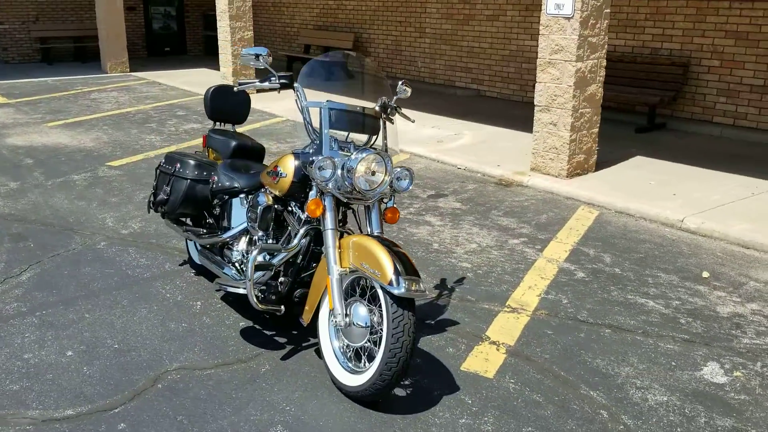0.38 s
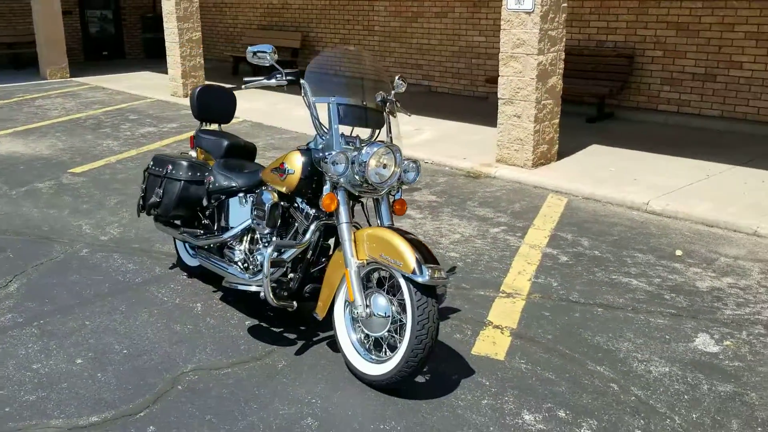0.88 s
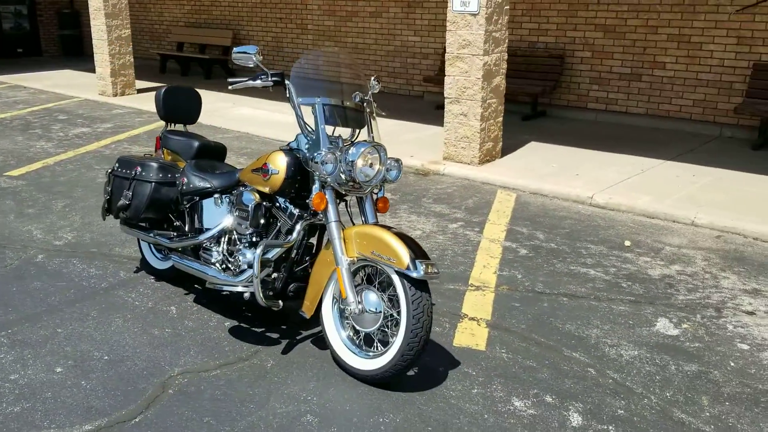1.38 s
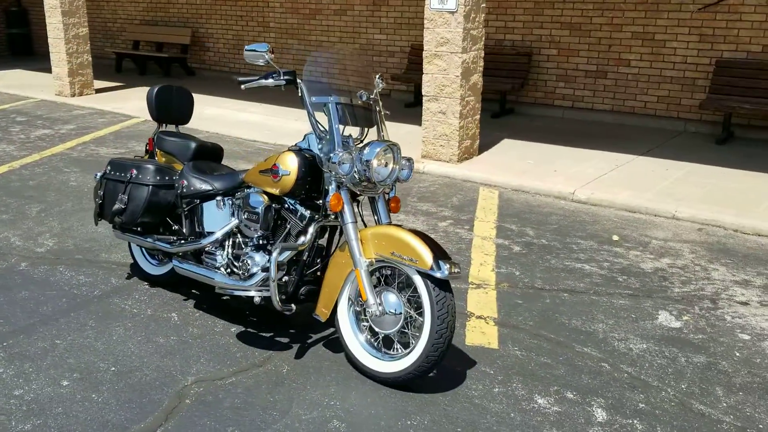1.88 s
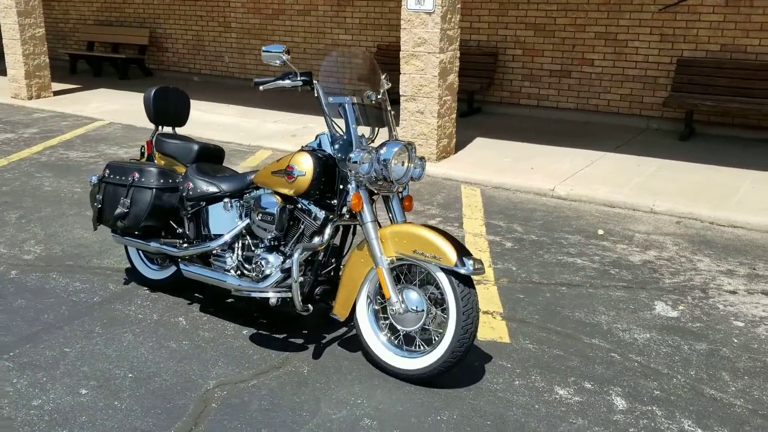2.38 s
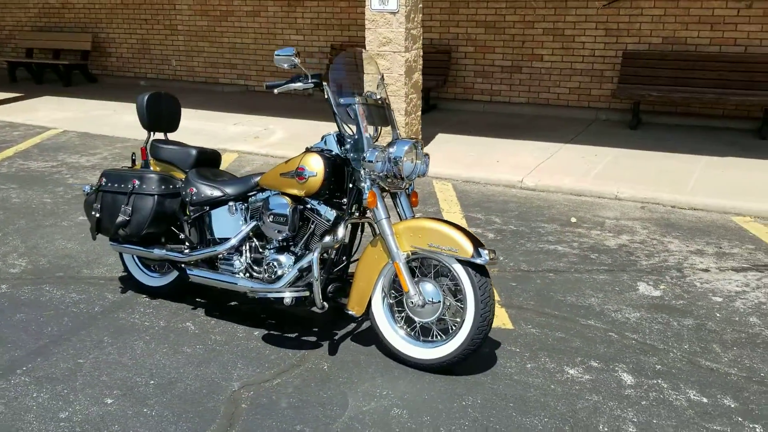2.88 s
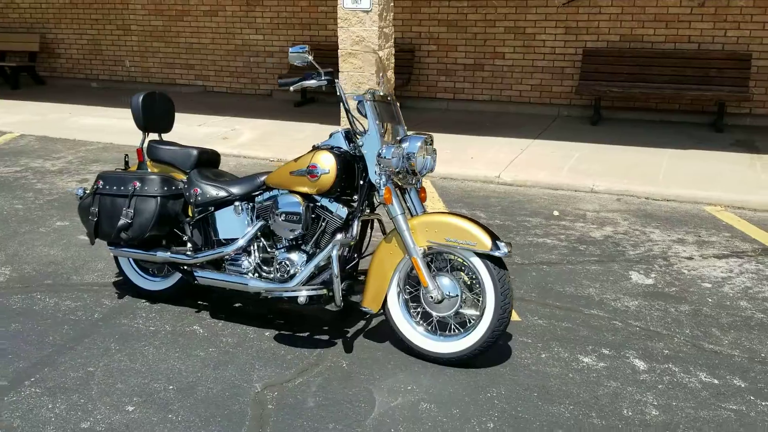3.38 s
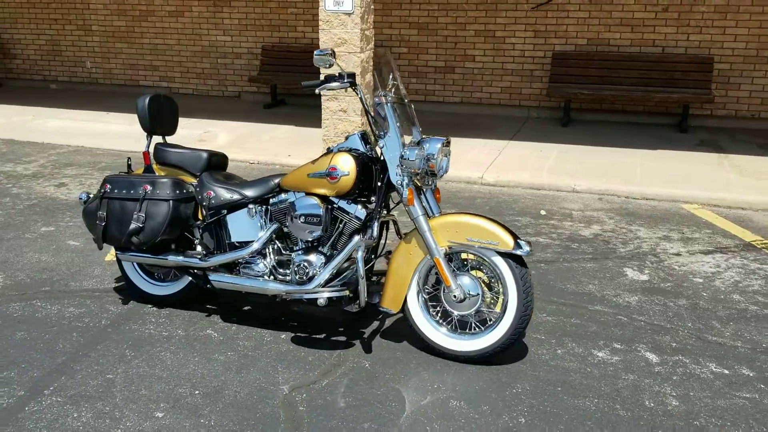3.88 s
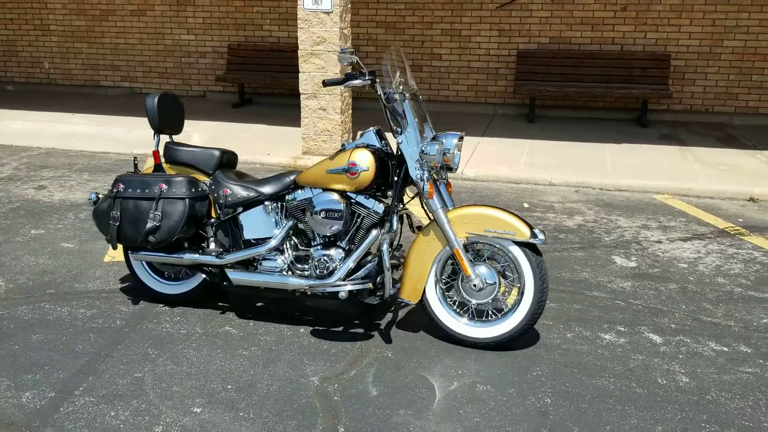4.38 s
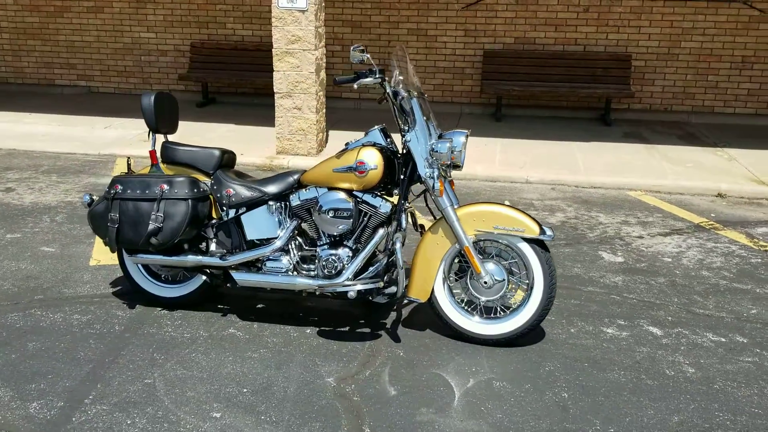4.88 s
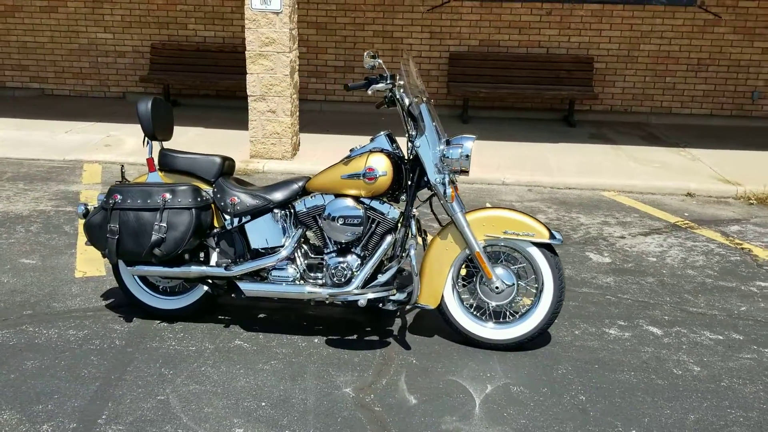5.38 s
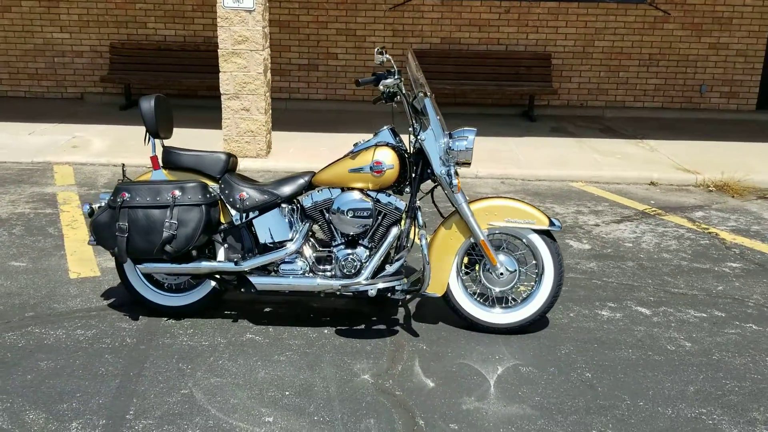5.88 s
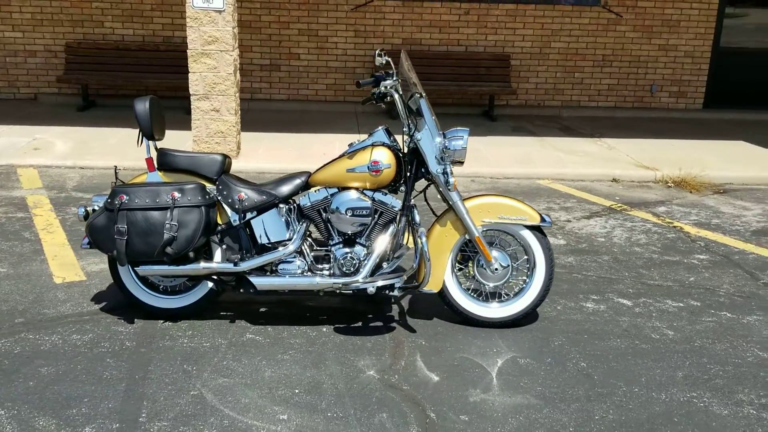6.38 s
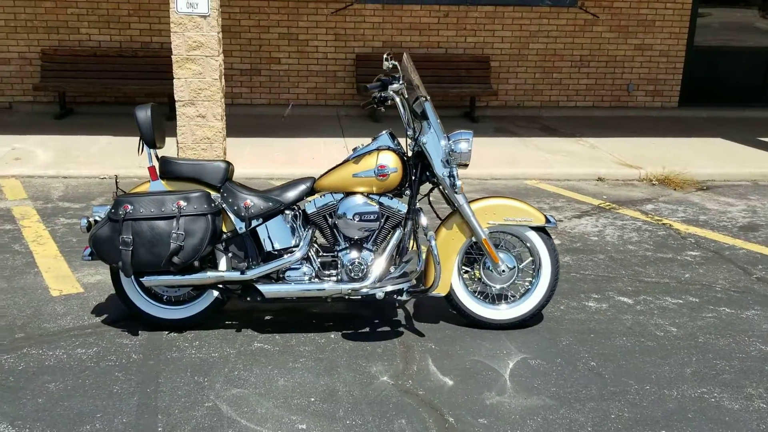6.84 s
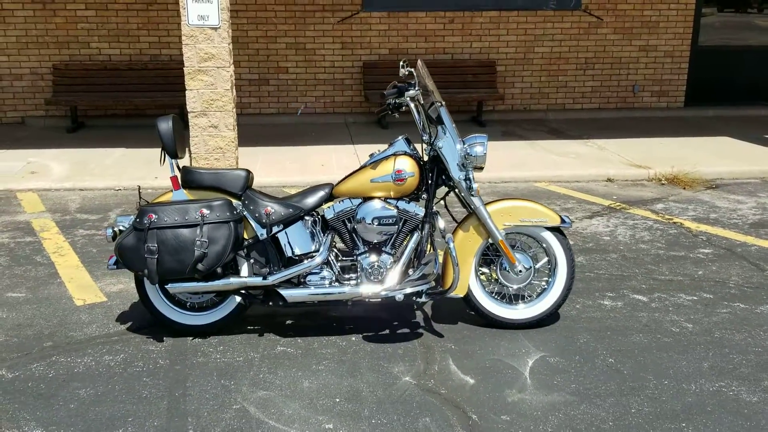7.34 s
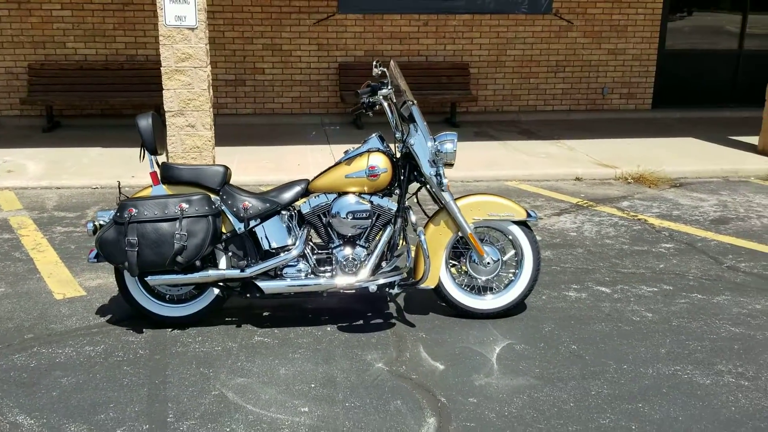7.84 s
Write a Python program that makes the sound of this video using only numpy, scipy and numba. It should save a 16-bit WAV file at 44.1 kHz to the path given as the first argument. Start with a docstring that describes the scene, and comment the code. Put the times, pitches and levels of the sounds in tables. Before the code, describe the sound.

A large V-twin motorcycle idles throughout in an open lot beside a brick wall. Deep thumps come about nine or ten a second in uneven pairs, strong then often weak, each strong one tipped with a short hissy crack. Fine metallic valve clatter and low rumble run underneath. A handheld phone moves slowly round it, catching brief echo off wall and asphalt, so the tone shifts gently.

```python
"""A big V-twin motorcycle idles on an asphalt lot, heard by a phone walking slowly round it.
The front cylinder fires every cycle, twice stumbling; the rear one often misses and burns weakly.
Each stroke rings the pipes as a thump, spits a crack of filtered hiss and knocks the muffler.
A brick wall sends these back as an echo, the asphalt and the lot return the cracks, and
valve-train clatter (hiss with small ticks) and a low rumble of noise run all through."""
import sys
import numpy as np
from scipy import signal
from scipy.fft import rfft, irfft, next_fast_len
from scipy.io import wavfile
from scipy.ndimage import uniform_filter1d, map_coordinates
from numba import njit

SR = 44100
rng = np.random.default_rng(int(sys.argv[2]) if len(sys.argv) > 2 else 0)


def transcribe(signal):
    """Save signal, clipped to [-1, 1], as a 16-bit WAV file at the path in sys.argv[1]."""
    frames = np.atleast_2d(signal).T
    limited = np.clip(frames, -1, 1)
    pcm = np.round(limited * 32767).astype(np.int16)
    wavfile.write(sys.argv[1], SR, pcm)


def ratio_of_db(decibels):
    """Turn decibels (scalar or array-like) into linear amplitude factors; 0 dB maps to 1."""
    return 10 ** (np.asarray(decibels, float) / 20)


N = 351918  # samples, about 8 s


def colour(x, points, lag=((1, 0), (2, 0))):
    """Shape a sound by (Hz, dB) points, with an optional phase lag (Hz, radians)."""
    size = next_fast_len(N + 4096)
    hz = np.arange(size // 2 + 1) * SR / size
    point_hz, point_db = np.transpose(points)
    lag_hz, lag_rad = np.transpose(lag)
    gain = ratio_of_db(np.interp(np.log(hz + 1), np.log(point_hz), point_db))
    turn = np.exp(-1j * np.interp(hz, lag_hz, lag_rad))
    return irfft(rfft(x, size) * gain * turn, size)[..., :N]


def level(x, db):
    """Scale to an rms level."""
    return x * ratio_of_db(db) / np.sqrt(np.mean(x ** 2))


@njit
def moving_bandpass(x, hz, width):
    """State-variable band-pass with a moving centre, where its gain is 1."""
    y, band, low = np.empty(len(x)), 0., 0.
    for i in range(len(x)):
        g, damping = np.tan(np.pi * hz[i] / SR), width / hz[i]
        v = (band + g * (x[i] - low)) / (1 + g * (g + damping))
        band, low = 2 * v - band, low + 2 * g * v
        y[i] = damping * v
    return y


def ringing(x, hz, width_hz, db):
    """One resonance, fixed or moving, on both microphone ports."""
    return ratio_of_db(db) * np.array([moving_bandpass(v, hz + np.zeros(N), width_hz) for v in x])


def wander(rate):
    """Random levels held 1 / rate s and smoothed twice by a moving average that long."""
    hold = int(SR / rate)
    steps = np.repeat(rng.standard_normal(N // hold + 1), hold)
    return 1.03 * uniform_filter1d(uniform_filter1d(steps, hold), hold)[:N]


def hiss(wide, apart_hz):
    """Noise shared by both ports in the bass, partly unrelated higher up."""
    near, *apart = rng.standard_normal((3, N))
    highpass = signal.butter(2, apart_hz, "high", fs=SR, output="sos")
    return near + wide * signal.sosfilt(highpass, apart)


def add(out, piece, s):
    """Mix a short sound in at time s."""
    i = int(s * SR)
    a, b = max(i, 0), min(i + len(piece), N)
    out[a:max(a, b)] += piece[a - i:max(b - i, a - i)]


# Tone of the clatter. Each row: frequency in Hz, gain in dB.
CLATTER_TONE = [(100, -34), (200, 6.5), (400, 5), (700, -0.5), (1000, 4), (1400, -0.5), (2500, -4),
                (3600, -0.5), (4300, -2.5), (5200, -8.5), (7200, -5.5), (9000, -25.5), (11800, -29),
                (16000, -40)]


def clatter(db, ticks_per_s=190.0, spread_db=3.5, tick_s=0.0028, tick_db=-8, flicker_db=2.17):
    """Valve gear, chain and intake: flickering hiss with small ticks and a faint casing ring."""
    size = ratio_of_db(spread_db * rng.exponential(size=N)) * (rng.random(N) < ticks_per_s / SR)
    ticks = signal.lfilter([1], [1, -np.exp(-1 / (tick_s * SR))], size)
    strength = ratio_of_db(flicker_db * wander(18)) + level(ticks, tick_db)
    gear = strength * hiss(wide=0.9, apart_hz=360.0)
    casing = ringing(gear, hz=916.0, width_hz=55.0, db=-4.0)
    return ratio_of_db(db) * level(colour(gear, CLATTER_TONE) + casing, 0)


# Tone of the rumble. Each row: frequency in Hz, gain in dB.
RUMBLE_TONE = [(25, -38), (40, -0.5), (60, -0.5), (85, -15), (150, -2), (200, -9), (300, -10.5),
               (500, -47.5)]


def rumble(db=-28, flicker_db=1.0):
    """Turbulent low pipe noise whose level flickers gently under the thumps."""
    return level(colour(rng.standard_normal(N), RUMBLE_TONE) * ratio_of_db(flicker_db * wander(17)), db)


# How far the crank has turned, read at the front cylinder's exhaust stroke; the idle hunts up and down.
# Each row: time in seconds, engine cycles so far.
CRANK_TURNS = [(.0122, 0), (.1218, 1), (.548, 5), (.86, 8), (.9686, 9), (1.0718, 10), (1.17, 11),
               (1.2834, 12), (1.4942, 14), (2.0302, 19), (2.7664, 26), (2.9824, 28), (3.5124, 33),
               (3.7179, 35), (3.9387, 37), (4.1526, 39), (4.3704, 41), (4.475, 42), (4.6899, 44),
               (4.9073, 46), (5.01, 47), (5.5516, 52), (5.6623, 53), (5.9884, 56), (6.1985, 58),
               (6.419, 60), (6.6275, 62), (7.7221, 72), (7.8306, 73), (7.9352, 74)]
# Full strokes as heard on the way round, before scatter and overall gains. Each row: time in seconds,
# front thump in dB, front crack in dB, rear thump in dB, rear crack in dB.
FULL_STROKES = [(0, -0.7, -19, 0, -29), (.7, -0.4, -17.5, -0.5, -27), (1.4, -0.8, -17.5, 0.7, -28),
                (2.6, -.5, -17, 1.5, -26), (3.6, -.5, -18.5, 2, -25), (4.6, -1.1, -18, 0.5, -24),
                (5.4, -0.7, -16, 0.5, -25.5), (6.3, -1.5, -17, -1.5, -25), (6.9, 0, -15.5, 2, -27),
                (8, 1.4, -15, -3.3, -23.5)]
# Rear misfires, whose charge burns late and weakly. Each row: rough time in seconds, thump in dB.
WEAK_REAR_STROKES = [(.06, -7), (.277, -7.5), (.491, -7.5), (.7, -9.5), (.907, -6), (1.117, -9),
                     (1.542, -7.5), (1.755, -16), (1.97, -5), (2.183, -7.5), (2.395, -9), (2.605, -7.5),
                     (2.816, -6.5), (3.031, -9.5), (3.243, -17.5), (3.454, -6.5), (3.665, -5.5),
                     (3.875, -11), (4.094, -18), (4.526, -6.5), (4.74, -15), (5.059, -5), (5.275, -14),
                     (5.492, -6), (5.709, -6.5), (5.927, -7), (6.144, -7.5), (6.357, -8.5), (6.573, -8),
                     (6.785, -7)]
# Front strokes that stumble. Each row: rough time in seconds, thump in dB, crack in dB.
WEAK_FRONT_STROKES = [(1.17, -4, -36), (6.627, -2.5, -26)]
# Random spread from stroke to stroke. One row: time in seconds, thump in dB, crack in dB.
STROKE_SCATTER = (0.00056, 0.85, 1.75)


def strokes(rear_follows=.451, weak_crack_db=-37.5):
    """Exhaust strokes (s, thump dB, crack dB), front and rear in turn, timed by the crank."""
    s, cycle = np.transpose(CRANK_TURNS)
    front = np.interp(np.arange(cycle[-1] + 1), cycle, s)
    rear = front[:-1] + rear_follows * np.diff(front)  # rear_follows is a share of a cycle
    when, *columns = np.transpose(FULL_STROKES)
    rows = np.zeros((len(front) + len(rear), 3))
    rows[::2] = np.transpose([front] + [np.interp(front, when, c) for c in columns[:2]])
    rows[1::2] = np.transpose([rear] + [np.interp(rear, when, c) for c in columns[2:]])
    weak = [(np.argmin(abs(rows[:, 0] - t)), db) for t, db in WEAK_REAR_STROKES]
    # unburnt charge from a weak rear stroke strengthens the thump and crack of the next ones
    for k, db in weak:
        rows[k + 1, 1:] += 1.16, 0.55  # front, dB
        rows[k + 2, 1:] -= db * np.array((0.082, 0.32))  # rear, dB per dB missed
    rows += rng.standard_normal(rows.shape) * STROKE_SCATTER
    for k, db in weak:
        rows[k, 1:] = db, weak_crack_db
    for t, *dbs in WEAK_FRONT_STROKES:
        rows[np.argmin(abs(rows[:, 0] - t)), 1:] = dbs
    return rows


# Tone of the gas jet. Each row: frequency in Hz, gain in dB.
CRACK_TONE = [(200, -32), (480, 6.5), (750, -6.5), (1100, 4), (1400, 6.5), (1700, -0.5), (2000, 11),
              (2500, 0), (4200, -0.5), (5000, -9), (7000, -5), (9300, -26), (11500, -3.5), (15500, -24)]


def cracks(fired, bright_hz, peak_s=-0.00093, rise_s=0.0018, fall_s=0.0046, tail_db=-13, tail_s=0.0073,
           crack_db=-2.5, rear_ring_db=-7):
    """A short jet of gas at each stroke, coloured by muffler and shell; a bright resonance rings most on front
    strokes."""
    gates, t = np.zeros((2, N)), np.arange(SR // 14) / SR - 6 * rise_s
    fall = (np.exp(-t / fall_s) + ratio_of_db(tail_db) * np.exp(-t / tail_s)) / (1 + ratio_of_db(tail_db))
    for k, (s, _, db) in enumerate(fired):
        puff = np.where(t < 0, np.exp(t / rise_s), fall)
        add(gates[k % 2], ratio_of_db(db) * puff, s + peak_s + t[0])
    gas = hiss(wide=0.73, apart_hz=3870.0)
    jet = gates.sum(axis=0) * gas
    bright_gas = (gates[0] + ratio_of_db(rear_ring_db) * gates[1]) * gas
    bright_ring = ringing(bright_gas, bright_hz, width_hz=465.0, db=12)
    shell = ringing(jet, hz=934.0, width_hz=55.0, db=8.0)
    shell += ringing(jet, hz=1360.0, width_hz=75.0, db=-0.5)
    shell += ringing(jet, hz=2010.0, width_hz=37.0, db=-3.0)
    return ratio_of_db(crack_db) * (colour(jet, CRACK_TONE) + bright_ring + shell)


def delayed(x, lag_ms):
    """Read a sound at a moving lag, as along a path that changes length."""
    place = np.arange(N) - lag_ms / 1000 * SR
    return np.array([map_coordinates(v, [place], order=3) for v in x])


def lot(x, t60_s=0.72, db=-17):
    """Diffuse return from the buildings round the lot: a fading noise tail, different at each port."""
    t = np.arange(int(.6 * SR)) / SR
    tail = rng.standard_normal((2, len(t))) * 1000. ** (-t / t60_s) * (1 - np.exp(-t / 0.004))
    return ratio_of_db(db) * signal.fftconvolve(x, tail / np.sqrt(np.sum(tail[0] ** 2)), axes=1)[:, :N]


def stroke_kind(k, thump_db, misfire_below_db=-4):
    """0 for a front stroke, 1 for a rear one, 2 for a misfire."""
    return 2 if thump_db < misfire_below_db else k % 2


def ring(t, modes, kind, detune, scatter_db, rise_s=.01):
    """Damped pipe modes that swell in as the valve moves."""
    t = np.maximum(t, 0)
    tones = 0
    for (hz, t60, *sizes), db in zip(modes, scatter_db):
        fade = 1000. ** (-t / t60)
        tones = tones + sizes[kind] * ratio_of_db(db) * np.sin(2 * np.pi * hz * detune * t) * fade
    return (1 - np.exp(-t / rise_s)) * tones


# Pipe modes rung as the exhaust valve opens. Each row: frequency in Hz before detuning, time to fade
# 60 dB in seconds, then signed size for a front stroke, a rear stroke and a misfire.
BLOWDOWN_MODES = [(73.8, .4, -.25, -.214, .51), (103.7, .324, .331, .403, .59),
                  (131.4, .4, .112, .207, .21), (233.7, .057, -.233, .057, .045),
                  (316.6, .033, -.243, .005, -.04)]
# Pipe modes rung as the flow chokes and washes back. Each row: frequency in Hz before detuning, time to
# fade 60 dB in seconds, then signed size for a front stroke, a rear stroke and a misfire.
BACKWASH_MODES = [(85.1, .148, .073, .341, -.47), (102.3, .084, .183, .409, 1.47),
                  (137.6, .08, -.281, -.353, -.6), (146.9, .025, -.394, .205, -1.45)]
# Valve timing, with a row each for front, rear and misfire (bark() uses it too).
# Each row: seconds the valve opens before the stroke time, seconds the flow chokes after it.
VALVE_TIMES = [(.0075, .0243), (.0076, .0134), (.0091, .018)]


def thumps(fired, detune=.014, choke_s=.0045, choke_jitter_s=0.00032, scatter_db=.9):
    """Blowdown as the valve opens, choked and followed by a backwash; no two strokes ring quite alike."""
    out, t = np.zeros(N), np.arange(SR // 6) / SR
    chance = rng.standard_normal((len(fired), 11))
    for k, ((s, db, _), c) in enumerate(zip(fired, chance)):
        kind = stroke_kind(k, db)
        opens, chokes = VALVE_TIMES[kind]
        after = t - opens - chokes - choke_jitter_s * c[0]
        pitch = 1 + detune * c[1]
        blow = ring(t, BLOWDOWN_MODES, kind, pitch, scatter_db * c[2:7])
        blow = blow * np.exp(-np.maximum(after, 0) / choke_s)
        wash = ring(after, BACKWASH_MODES, kind, pitch, scatter_db * c[7:])
        add(out, ratio_of_db(db) * (blow + wash), s - opens)
    return out


# Muffler shell modes knocked by every pressure front. Each row: frequency in Hz, width in Hz, gain in dB.
MUFFLER_MODES = [(249, 42, -17), (271, 25, -5.5), (299.8, 18.4, -4), (365.4, 33, -1.5), (421, 77, -7.5),
                 (503, 32, -8), (604, 60, -6)]


def bark(fired, db, rear_db=-4, choke_db=-4.5, dull_db=6, scatter_db=2.8, late_s=0.0016, front_s=0.0012):
    """Each stroke knocks the muffler modes twice: for the opening valve and, duller, the choking flow."""
    out = np.zeros(N)
    for hz, width_hz, mode_db in MUFFLER_MODES:
        knocks = np.zeros(N)
        chance = rng.standard_normal((len(fired), 2))  # every mode gets its own share
        for k, ((s, thump_db, _), c) in enumerate(zip(fired, chance)):
            open_db = thump_db + rear_db * (k % 2) + scatter_db * c[0]
            shut_db = choke_db - dull_db * np.log2(hz / 240) + scatter_db * c[1]
            add(knocks, [ratio_of_db(open_db)], s + late_s)
            add(knocks, [-ratio_of_db(shut_db)], s + VALVE_TIMES[stroke_kind(k, thump_db)][1])
        mode = moving_bandpass(knocks, hz + np.zeros(N), float(width_hz))
        out += ratio_of_db(mode_db) * mode / np.sqrt(width_hz)
    return ratio_of_db(db) * level(uniform_filter1d(out, int(front_s * SR)), 0)


def brick(x, smear_s=0.0053):
    """Pillars, benches and courses of brick spread the echo over a few milliseconds."""
    t = np.arange(SR // 30) / SR
    scatter = rng.standard_normal((2, len(t))) * np.exp(-t / smear_s)
    return signal.fftconvolve(x, scatter / np.sqrt(np.sum(scatter[0] ** 2)), axes=1)[:, :N]


# Tone of the wall's echo. Each row: frequency in Hz, gain in dB.
WALL_TONE = [(60, -13.5), (300, -4.5), (1500, -25), (4000, -18.5), (5500, -1.5), (7500, -2.5), (10000, -13),
             (16000, -31)]


def wall_echo(crack, thump, wall_ms):
    """The pipes point at the wall, so their bright beam comes back strongest."""
    return colour(delayed(brick(crack) + thump, wall_ms - 2), WALL_TONE)


# Walking round the motorcycle. Each row: time in seconds, wall echo lag in ms (the echo comes 2 ms sooner),
# ground bounce lag in ms, bright resonance of the cracks in Hz, clatter in dB, bark in dB.
WALK_ROUND = [(0, 99.4, 0.76, 3450, -35, -33.5), (1.3, 75, 0.86, 3760, -36, -33.5),
              (2.7, 79, 0.778, 3380, -35, -33), (4, 78, 0.86, 3640, -36.5, -36),
              (5.3, 72.5, 0.847, 3530, -37, -37.5), (6.6, 72, 0.85, 3300, -37.5, -35),
              (8, 62, 1.08, 3370, -37.5, -38)]


def scene():
    """Engine, its bounce off the asphalt, its echo from the wall, the lot's return and the rumble."""
    s, *columns = np.transpose(WALK_ROUND)
    paths = [np.interp(np.arange(N) / SR, s, c) for c in columns]
    wall_ms, ground_ms, bright_hz, clatter_db, bark_db = paths
    fired = strokes()
    gear = clatter(clatter_db)
    crack = cracks(fired, bright_hz)
    # the changing path via the asphalt moves the comb of notches in the cracks
    bounce = ratio_of_db(-9) * delayed(crack, ground_ms)
    thump = ratio_of_db(4.0) * thumps(fired) + bark(fired, bark_db)
    echo = wall_echo(crack, thump, wall_ms)
    return thump + crack + gear + bounce + echo + rumble() + lot(crack)


def band_limit(x):
    """A steep low-pass at the top of the band."""
    return signal.sosfilt(signal.butter(12, 16310, fs=SR, output="sos"), x)


# Right microphone port against the left. Each row: frequency in Hz, gain in dB.
RIGHT_PORT_TONE = [(60, -2.5), (350, -4.5), (680, 1.5), (1000, -14), (1700, 1.5), (2000, -12), (2500, -0.5),
                   (3600, -16), (5000, -1), (7000, -25.5), (9500, -11), (11500, -9), (16000, -3)]
# Phase between the ports. Each row: frequency in Hz, radians by which the left port leads.
RIGHT_PORT_LAG = [(0, -0.5), (60, 0.53), (150, -0.07), (300, 0), (700, 1.43), (1460, 1), (1810, 5),
                  (2070, 3.5), (3100, 5.5), (3700, 3.5), (4480, 13.5), (7840, 33.5), (16000, 49)]
# Edges of what the phone picks up. One row: low edge in Hz, high edge in Hz.
PHONE_BAND = (28, 15900)


def record(dry):
    """The right port is shaded and out of step with the left; the phone cuts deep bass and the top."""
    ports = np.array([dry[0], colour(dry[1], RIGHT_PORT_TONE, RIGHT_PORT_LAG)])
    bass_cut = signal.butter(1, PHONE_BAND[0], "high", fs=SR, output="sos")
    top_cut = signal.ellip(8, .2, 60, PHONE_BAND[1], fs=SR, output="sos")
    ports = signal.sosfilt(top_cut, signal.sosfilt(bass_cut, ports))
    return band_limit(ports)


dry = scene()
out = record(dry)
transcribe(out)
```